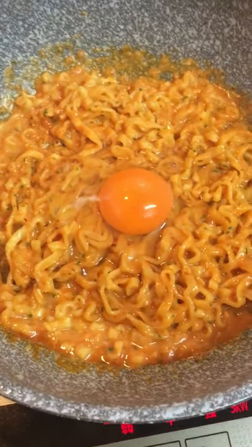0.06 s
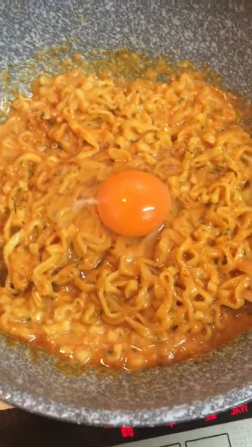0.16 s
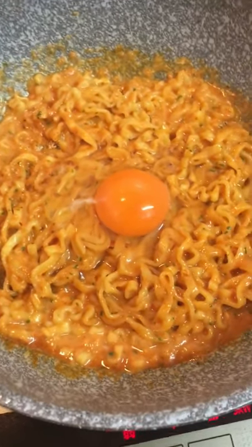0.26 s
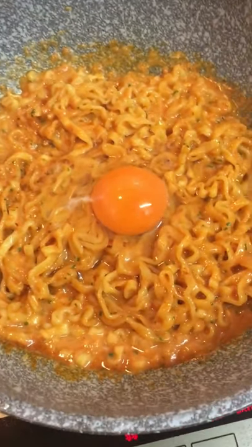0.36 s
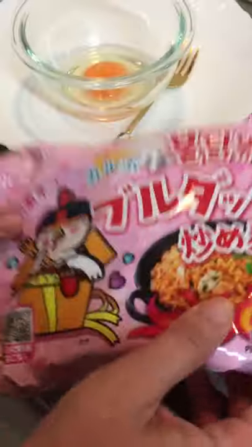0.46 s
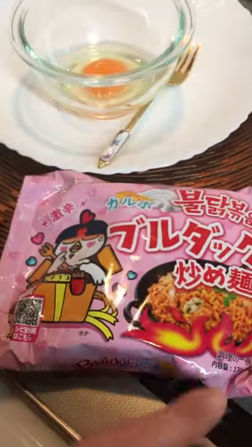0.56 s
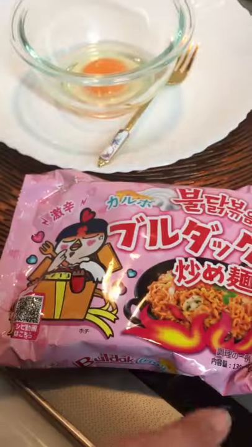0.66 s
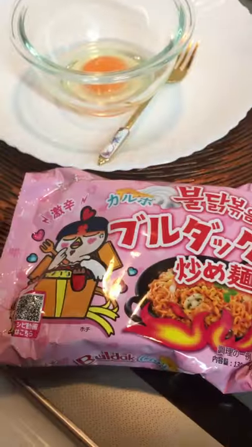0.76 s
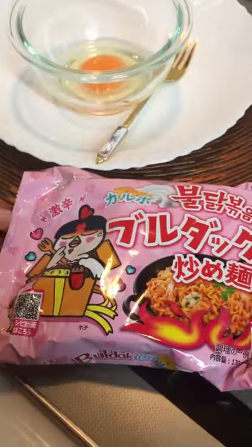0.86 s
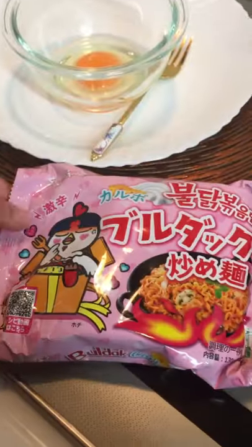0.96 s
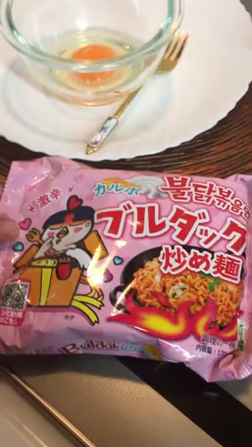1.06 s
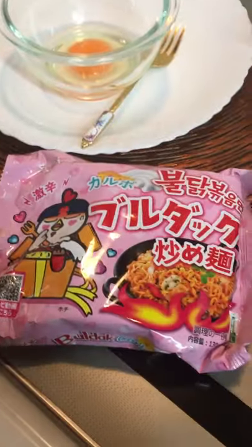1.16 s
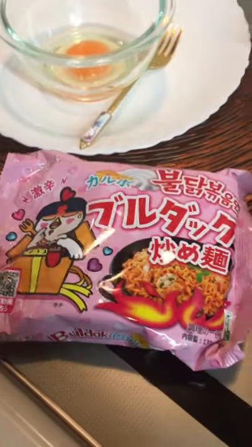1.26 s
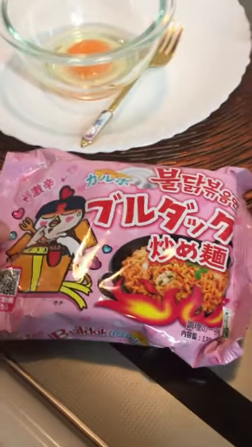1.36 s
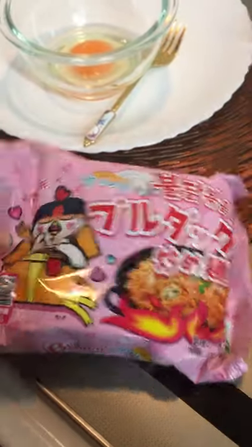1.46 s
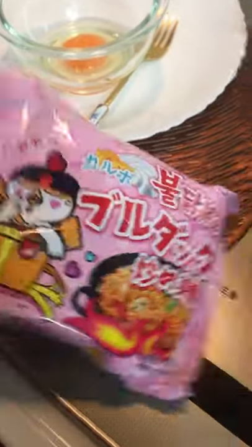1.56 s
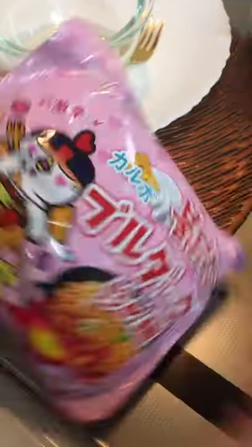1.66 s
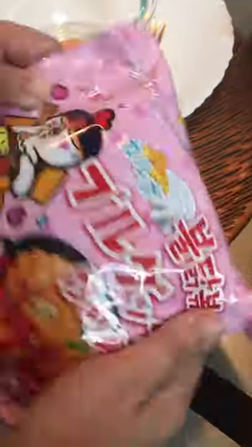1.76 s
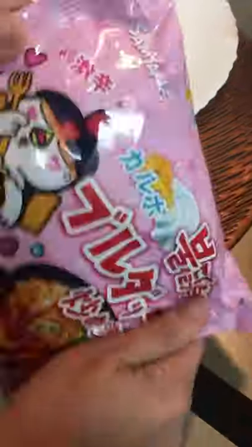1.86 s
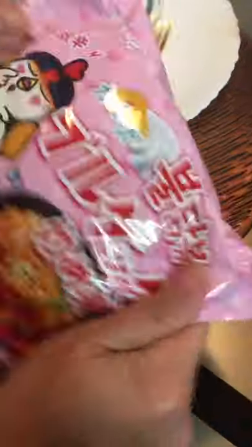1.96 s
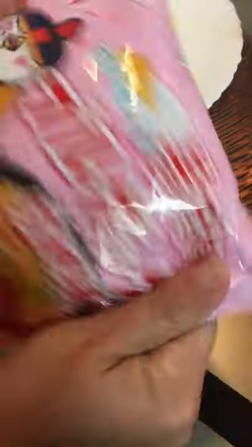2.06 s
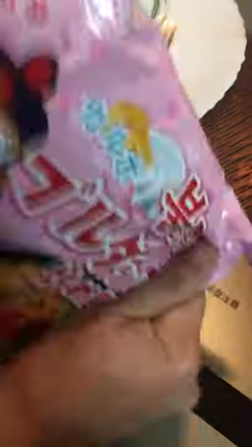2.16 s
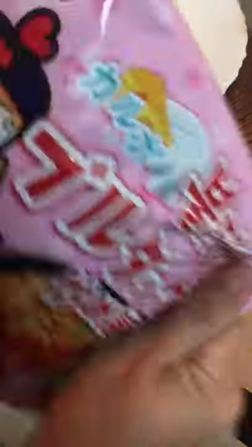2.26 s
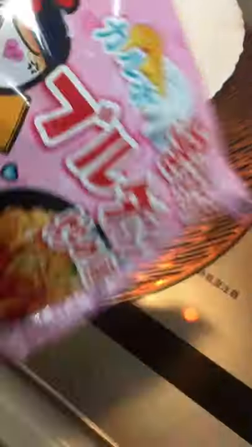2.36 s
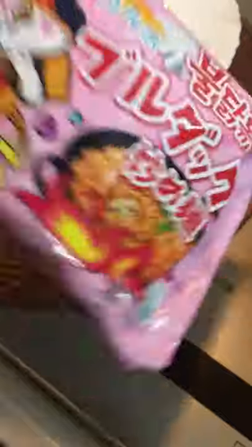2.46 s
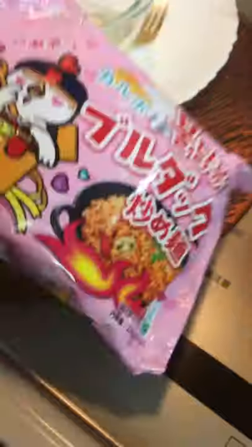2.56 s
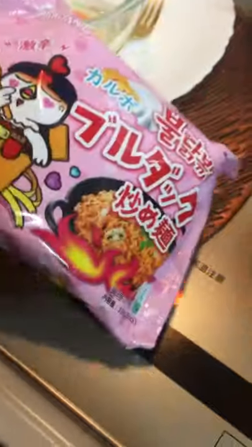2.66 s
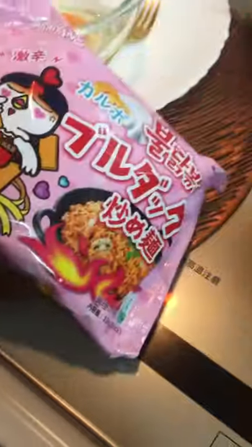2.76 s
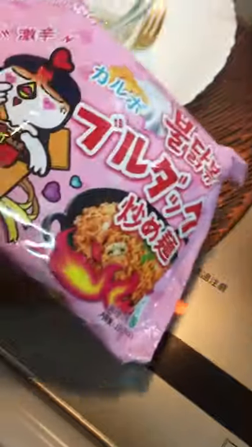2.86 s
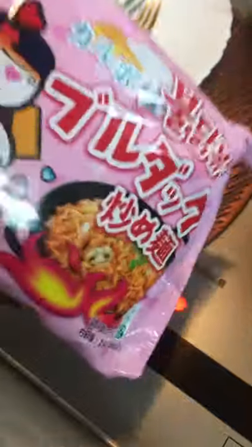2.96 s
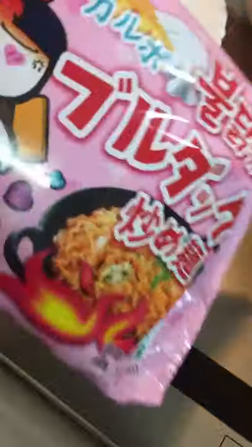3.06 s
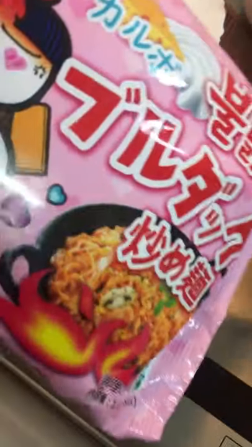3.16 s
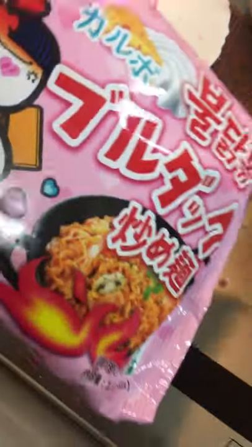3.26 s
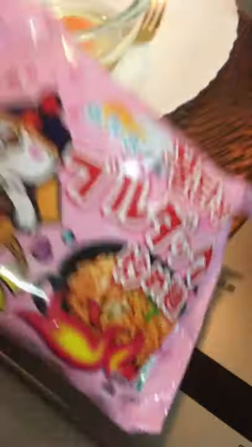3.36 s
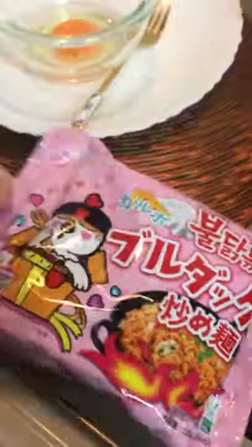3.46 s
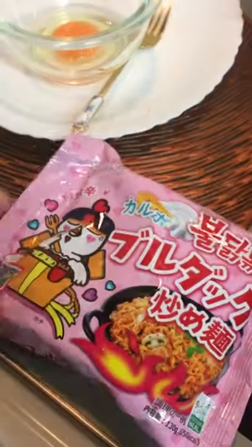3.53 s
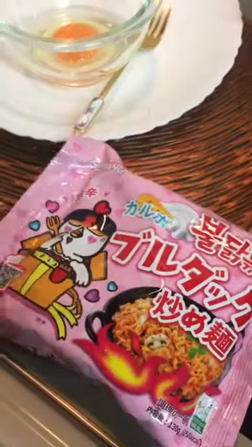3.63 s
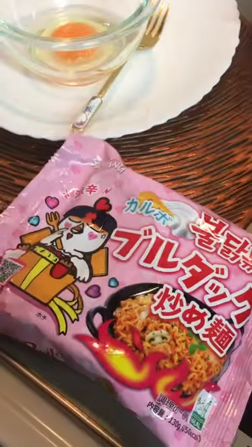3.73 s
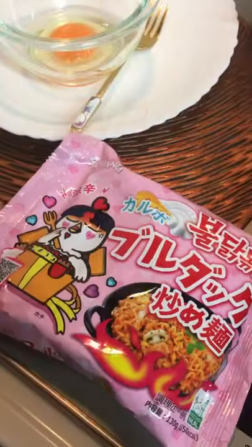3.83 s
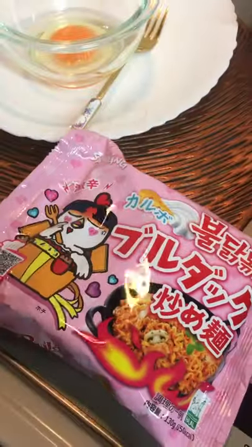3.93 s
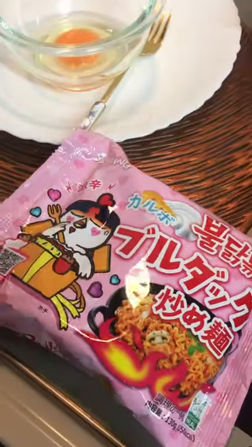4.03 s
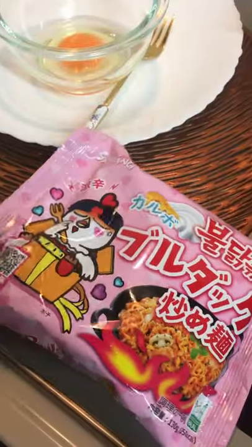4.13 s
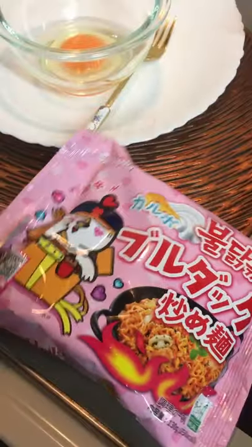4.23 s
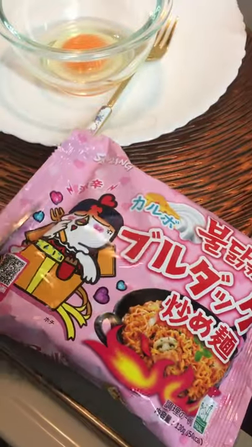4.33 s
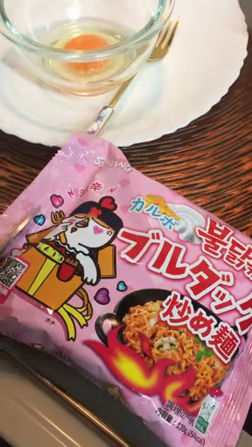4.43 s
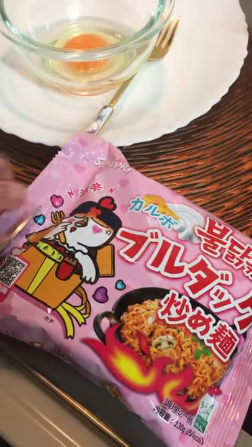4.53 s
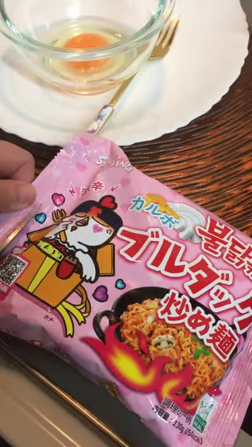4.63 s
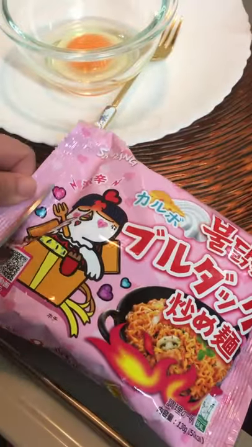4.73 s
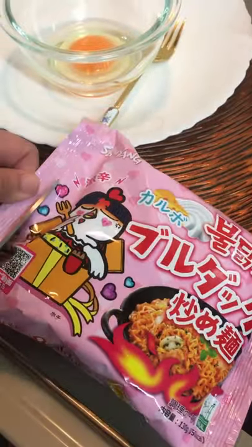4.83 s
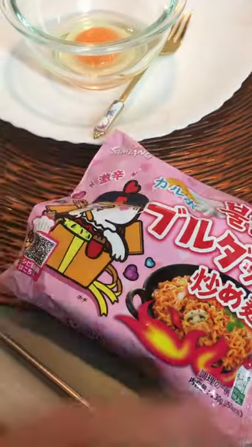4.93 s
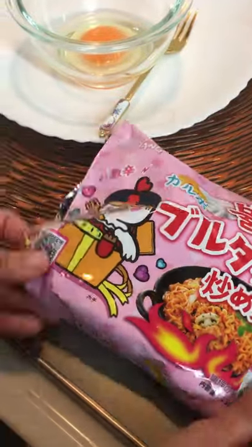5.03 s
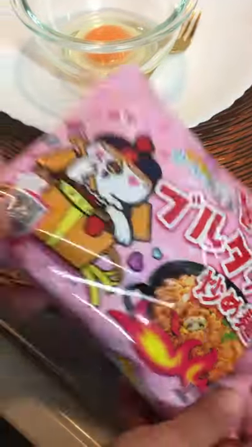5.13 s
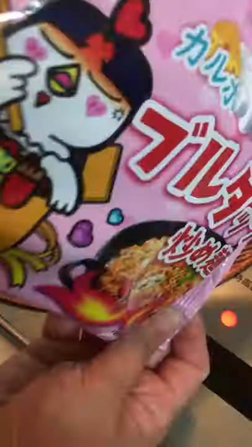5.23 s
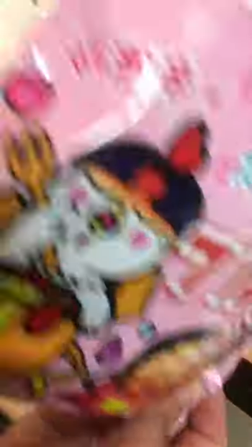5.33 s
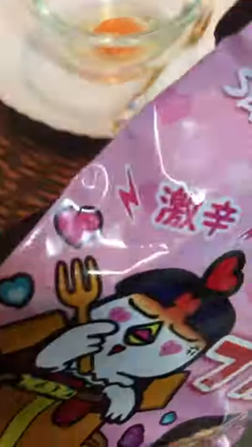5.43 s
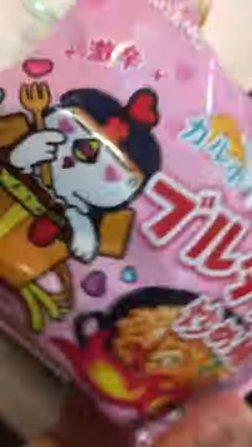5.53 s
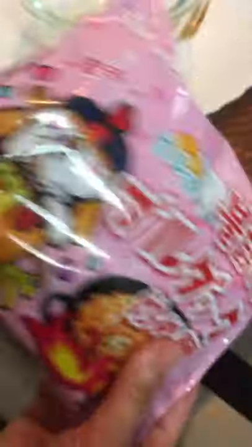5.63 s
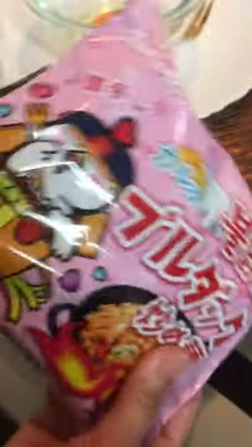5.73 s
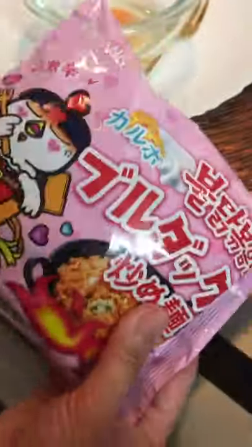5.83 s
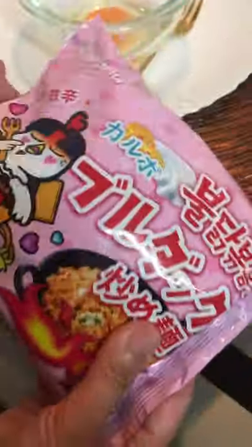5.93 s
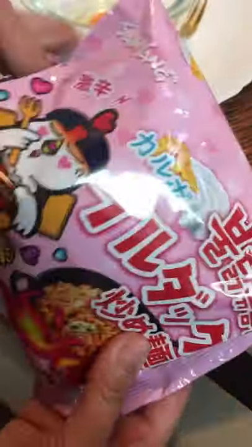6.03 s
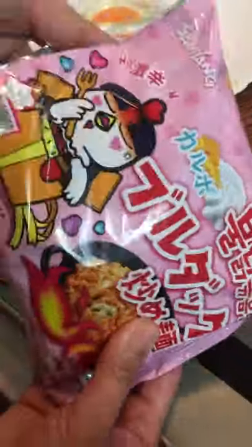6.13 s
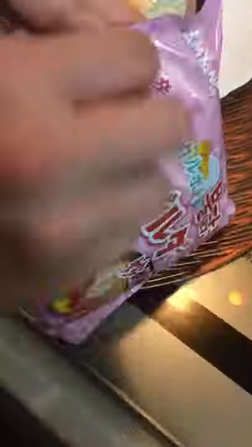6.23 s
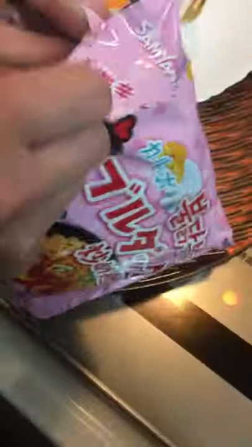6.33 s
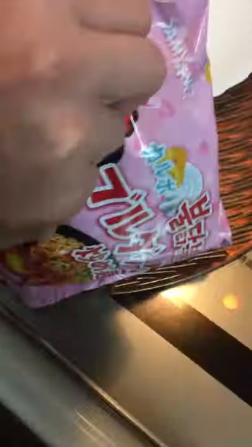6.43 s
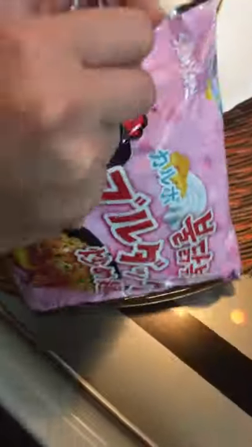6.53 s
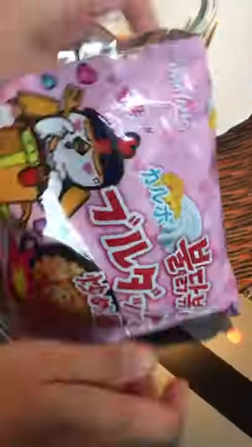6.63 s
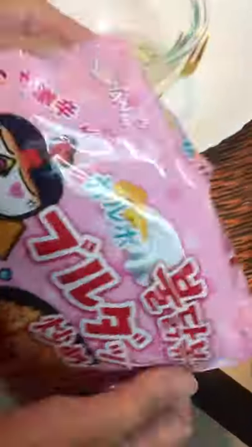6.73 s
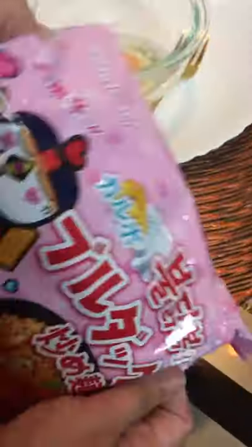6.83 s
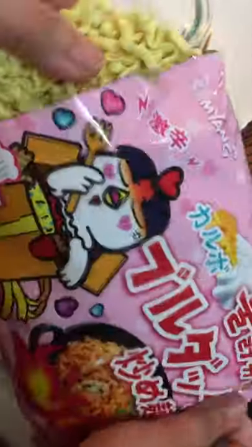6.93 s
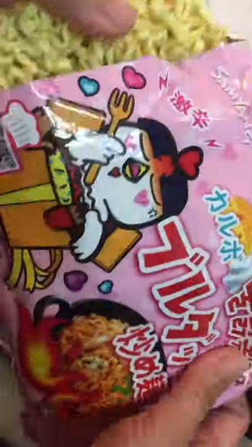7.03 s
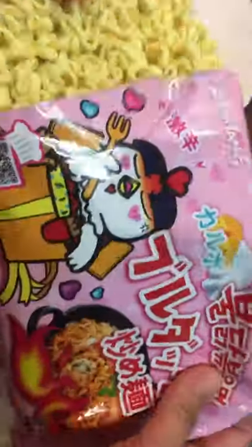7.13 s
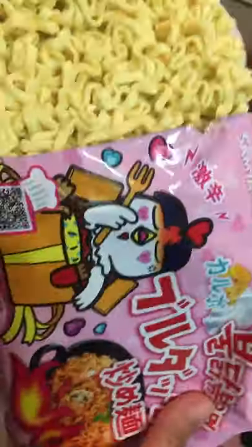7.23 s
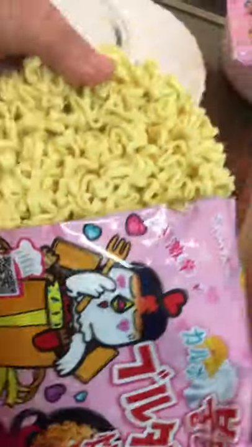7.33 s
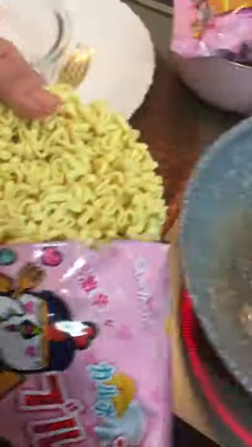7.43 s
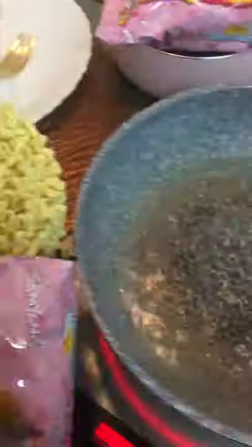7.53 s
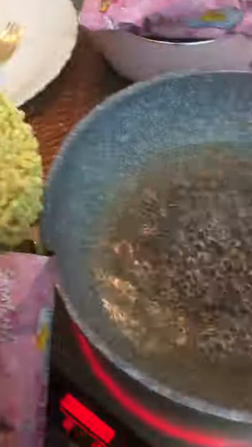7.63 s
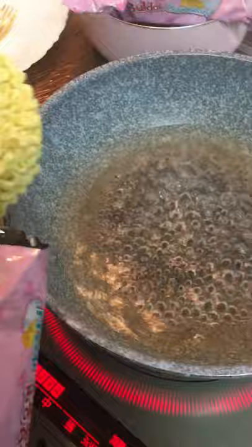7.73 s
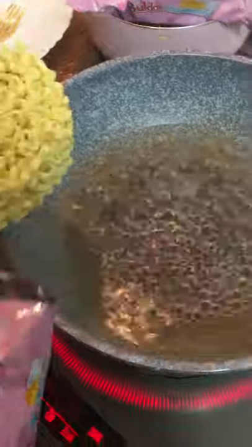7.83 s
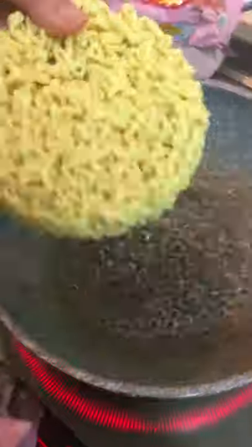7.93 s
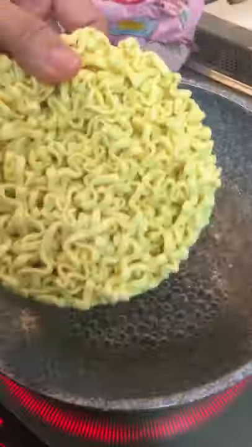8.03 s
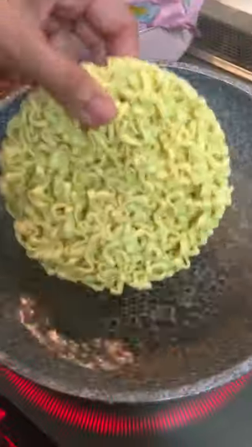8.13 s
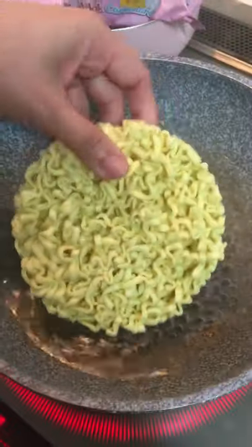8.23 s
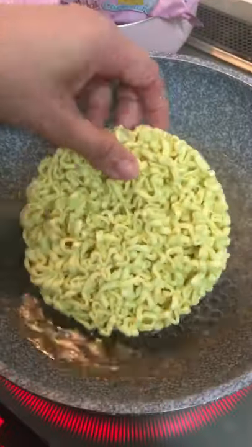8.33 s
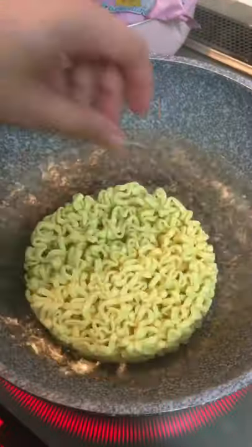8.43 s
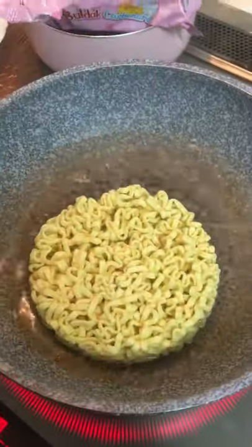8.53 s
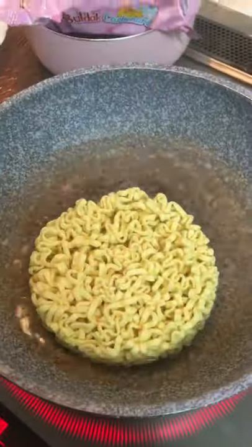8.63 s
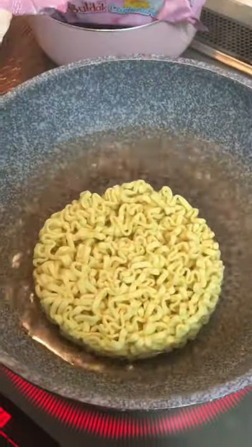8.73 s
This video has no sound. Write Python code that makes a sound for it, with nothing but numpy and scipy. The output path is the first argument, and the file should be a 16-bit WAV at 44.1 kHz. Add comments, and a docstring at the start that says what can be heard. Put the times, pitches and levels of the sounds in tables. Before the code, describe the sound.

Very close in a small kitchen with short reflections. From 0 to 0.35 s, faint sauce sizzle over low, rumbly humming air, a small pop at 0.2 and a tiny clink as it fades. At 0.52 a plastic packet slaps hard on the counter with a bright crack, then rests over a low steady hum. From 1.2 crinkling grows; between 1.7 and 2.4 it is dense and loud, full of sharp snaps, then thins. At 3.4 the packet drops with a firm knock; sparse crackles, squeezes and soft dull bumps follow until a cut at 4.8. The next shot sounds speeded up, with a higher fan hum: light quick crinkles from 5, then bright, brisk tearing crackle from 5.9 to 7.1. It dwindles to small ticks; a snap with a faint knock at 8.4 and brief crackle until 8.8 end it, fan noise fading after 9.

```python
"""Noodles sizzle in a pan, with one pop and a faint clink; then a plastic noodle packet is slapped down,
crinkled, lifted and torn open in a small kitchen, heard close. Three edited shots, faded at the cuts:
the pan, the packet by a humming counter, and a faster shot by the stove, whose fan hums higher.
Crackle is dense random pops of film panels; snaps are cracks of noise with a ringing panel; knocks ring
the packet and counter with a gritty push; air is filtered noise, and hums are wavering tones."""
import sys
import numpy as np
from scipy import signal
from scipy.fft import rfft, irfft
from scipy.io import wavfile

SR = 44100
rng = np.random.default_rng(int(sys.argv[2]) if len(sys.argv) > 2 else 0)


def to_wav(s):
    """Save 16-bit WAV."""
    ch = np.atleast_2d(s).T  # columns
    pcm = np.round(np.clip(ch, -1, 1) * 32767)  # PCM
    wavfile.write(sys.argv[1], SR, pcm.astype(np.int16))


N = 387638

# Fades of the pan, packet and stove shots: fade_in_s, full_s, fade_out_s, silent_s
SHOTS = [(-1, -.5, .27, .39), (.41, .525, 4.7, 4.84), (4.855, 5.03, 9, 10)]
# Colour of the steady air, one spectrum a shot: freq_hz, relative level_db
AIR_COLOURS = [
    [(15, -48), (25, -4), (114, 3), (212, -3.5), (263, -12), (1290, -18), (1520, -21.5), (7110, -32.5),
     (11900, -30), (16000, -33)],
    [(15, -62), (25, -30), (200, -4), (256, -10), (405, -11.5), (516, -16.5), (1560, -25.5), (1840, -17.5),
     (2150, -27), (2700, -23.5), (3620, -33), (4250, -27), (9840, -37), (13600, -33.5), (16000, -52.5)],
    [(35, -77), (60, -43), (156, -12), (354, -4.5), (417, -1.5), (553, -7.5), (862, -8.5), (1010, -17.5),
     (1310, -17), (1950, -22.5), (2840, -20), (3350, -23), (3850, -19.5), (4700, -24), (5400, -19.5),
     (6400, -26.5), (8120, -31), (13300, -26), (16000, -36)],
]
# Mean air level of each shot: level_db
AIR_LEVELS_DB = [-46, -51, -51]
# Appliance hums, one list a shot: pitch_hz, mean level_db (rms), waver_hz
HUMS = [
    [(100.4, -47.5, 17)],
    [(200, -53.5, 4.8), (90.6, -64.5, 20)],
    [(420, -54, 12), (179, -67, 34)],
]
# Single snaps of the film, led by one pop in the pan: start_s, peak_db of the bright part, panel pitch_hz
SNAPS = [(0.2219, -29, 1160), (0.5228, -8, 1490), (0.5264, -7, 2500), (0.659, -34, 8100),
         (1.1846, -28.5, 2160), (1.228, -23, 970), (1.272, -16.5, 13100), (1.321, -17.5, 1570),
         (1.3573, -17, 12000), (1.4823, -14, 6140), (1.6567, -14.5, 4750), (1.747, -13, 2980),
         (1.758, -11, 2900), (1.822, -9.5, 3010), (1.8461, -10.5, 2140), (1.909, -13, 2000),
         (2.012, -24, 2540), (2.061, -8.5, 2500), (2.099, -12, 2290), (2.117, -8.5, 1900),
         (2.184, -11, 5200), (2.199, -8.5, 2520), (2.305, -6.5, 4020), (2.3531, -14, 5470),
         (2.4596, -22.5, 1490), (2.5644, -23, 10500), (2.615, -27, 6960), (2.874, -25, 1400),
         (2.9969, -16, 13500), (3.237, -28.5, 4480), (3.312, -30, 11100), (3.3275, -17.5, 13300),
         (3.391, -13.5, 1490), (3.5046, -18.5, 2550), (3.594, -35, 1840), (3.707, -29.5, 2050),
         (3.741, -30, 2340), (3.8999, -23.5, 2550), (3.9363, -19.5, 4800), (3.9967, -25, 1990),
         (4.0272, -13.5, 3220), (4.1034, -13.5, 2060), (4.252, -19, 2140), (4.2949, -20.5, 6210),
         (4.357, -21.5, 2860), (4.4335, -24.5, 1920), (4.5034, -31, 2870), (4.582, -26, 2900),
         (4.7567, -22, 2340), (5.1886, -21.5, 13500), (5.3067, -15.5, 5760), (5.344, -24, 14300),
         (5.4789, -25.5, 8510), (5.5792, -18, 10900), (5.724, -20.5, 8580), (5.8515, -13, 11400),
         (5.9768, -8.5, 12700), (5.989, -15, 12000), (6.1715, -7.5, 11000), (6.345, -19, 11300),
         (6.437, -13, 11000), (6.4937, -14.5, 11700), (6.533, -14, 10400), (6.6457, -11.5, 9020),
         (6.7327, -9.5, 13100), (6.99, -12.5, 11500), (7.0045, -13, 12400), (7.0903, -14, 12100),
         (7.228, -31, 13200), (7.2396, -28, 9670), (7.344, -33, 3850), (8.375, -22, 8960),
         (8.6335, -18, 6450), (8.7012, -17, 9200)]
# Colour of small creases: freq_hz, level_db
CRISP = [(700, -19.5), (1300, -8), (2100, -5), (4500, -3.5), (8900, -4), (9800, -6), (12400, 1),
         (15500, -5.5)]
# Colour of large creases: freq_hz, level_db
DEEP = [(70, -38), (110, -0.5), (200, 1), (330, -2), (700, -4.5), (1300, -3.5), (2500, -47)]
# Packet meeting the counter, or noodle block knocking inside: start_s, peak_db, contact spread_s
KNOCKS = [(0.522, -7.5, 0.0022), (0.549, -26, 0.0046), (0.559, -25, 0.0055), (1.548, -26.5, 0.0051),
          (2.19, -23.5, 0.0052), (2.772, -29.5, 0.005), (3.389, -9.5, 0.0019), (3.511, -26, 0.0075),
          (6.346, -23, 0.0049), (6.529, -26, 0.018), (8.375, -38, 0.0073)]
# Ringing of packet and counter, before any speeding up: pitch_hz, level_db, t60_s
BODY_MODES = [(140, -16.5, 0.044), (212, -23, 0.042), (268, -19.5, .05), (427, -2, 0.056),
              (529, -1.5, 0.026), (630, -5.5, 0.039), (806, -11.5, 0.031), (1206, -2, 0.011),
              (1490, -11, 0.042), (2140, -5, 0.019), (2916, -9, 0.029)]
# Soft bumps through the counter: start_s, level_db, pitch_hz, t60_s
BUMPS = [(3.09, -36.5, 102, 0.35), (3.676, -28.5, 105, 0.16), (4.499, -39, 70.0, 0.15)]
# Decay of the kitchen reflections: freq_hz, t60_s
KITCHEN = [(200, 0.26), (1000, 0.11), (4000, 0.078), (12000, 0.071)]
# Large creases against small ones in the slow and the fast shot: level_db
DEEP_LEVELS_DB = [-12, -12]
# A faint clink as the first shot fades: start_s, level_db, pitch_hz, t60_s
CLINK = (0.368, -34, 2480, .04)
# Force of the hands in three long spells (lifting, turning over, tearing open): time_s, crackle level_db
GRIP = [
    [(1.216, -70), (1.228, -38), (1.27, -52), (1.345, -47.5), (1.37, -28.5), (1.45, -41.5), (1.48, -37),
     (1.54, -32.5), (1.59, -42.5), (1.65, -29.5), (1.675, -78)],
    [(1.705, -41), (1.72, -34), (1.755, -26), (1.79, -30.5), (1.85, -28.5), (1.88, -32.5), (1.915, -23.5),
     (1.945, -34.5), (1.965, -26.5), (2.005, -32.5), (2.025, -25.5), (2.06, -25.5), (2.08, -35),
     (2.11, -25.5), (2.2, -25), (2.228, -32.5), (2.24, -22.5), (2.285, -36.5), (2.31, -30), (2.37, -31),
     (2.42, -40), (2.54, -47), (2.6, -94)],
    [(5.9, -63), (5.92, -31.5), (5.95, -46), (5.985, -31.5), (6.045, -39.5), (6.065, -33.5), (6.13, -38),
     (6.145, -31.5), (6.2, -33.5), (6.23, -40), (6.26, -33), (6.33, -41.5), (6.347, -26.5), (6.36, -41.5),
     (6.41, -39.5), (6.48, -46.5), (6.495, -33.5), (6.522, -50.5), (6.536, -31.5), (6.62, -40), (6.69, -34),
     (6.735, -32), (6.77, -36), (6.8, -47), (6.82, -36), (6.88, -43), (6.93, -34), (6.95, -49.5),
     (7.0, -45), (7.05, -39.5)],
]
# Short separate squeezes of the film: start_s, length_s, crackle level_db
SQUEEZES = [(0.458, 0.068, -42), (0.525, 0.002, -21), (0.531, 0.031, -35), (2.762, 0.034, -44.5),
            (2.815, 0.12, -52.5), (3.389, 0.011, -27), (3.403, 0.03, -31.5), (3.45, 0.066, -40.5),
            (3.503, 0.046, -35.5), (3.817, 0.036, -50.5), (3.88, 0.75, -59.5), (3.99, 0.019, -34.5),
            (4.077, 0.015, -49), (4.138, 0.11, -42.5), (4.26, 0.07, -53), (4.349, 0.011, -36.5),
            (4.665, 0.074, -40), (5.002, 0.1, -37.5), (5.106, 0.053, -44), (5.178, 0.099, -54),
            (5.487, 0.063, -38), (5.551, 0.041, -37), (5.604, 0.059, -39), (5.703, 0.039, -45.5),
            (5.827, 0.032, -45), (5.872, 0.02, -36), (7.05, 0.077, -36.5), (7.145, 0.024, -35.5),
            (7.191, 0.033, -47.5), (7.27, 0.017, -45), (7.522, 0.12, -48.5), (8.494, 0.11, -40.5),
            (8.59, 0.24, -43.5)]
# Below this the packet radiates little, in the slow and the fast shot: cutoff_hz
FILM_LOW_HZ = [110, 159]

EDGE_HZ = 15900  # top of the audible band
SPEED = 2.1  # the last shot plays faster: raises crease rates, colours and knocks, shortens snaps
SIZZLE_DB = -56  # sauce spitting in the pan, rms
STRAY_DB, SETTLE_S = -66, 1.1  # faint ticks of touched film settling by itself, and when they start
REFLECTIONS_DB = -11.5
SNAP_DEEP_DB = -20  # deep part of a snap against its bright peak
DRIFT, DRIFT_HZ, SCATTER = .2, 24.9, .22  # slow and per-pop spread of panel size, share of the range
BUILD_S, BUILD_DB = 0.0064, -15  # the film creaks up to each snap
CRACK_S, FLUTTER_S, FLUTTER_DB = 0.00061, 0.0036, -15  # decay of the crack and of the settling after it


def gain_of(db):
    """Turns dB into amplitude."""
    return 10 ** (np.asarray(db) / 20)


def evened(x):
    """Scales to rms 1."""
    return x / np.sqrt(np.mean(x ** 2) + 1e-20)


def read(points, hz):
    """Reads a table on a log-frequency axis."""
    f, value = np.transpose(points)
    return np.interp(np.log(hz + 1), np.log(f + 1), value)


def add(mix, s, sound):
    """Mixes a sound in at s seconds."""
    part = mix[max(round(s * SR), 0):][:len(sound)]
    part += sound[:len(part)]


def sped(points, speed):
    """Moves a spectrum up by the playing speed."""
    return [(hz * speed, db) for hz, db in points]


def coloured(x, points):
    """Causal filter with the given spectrum (minimum phase by the cepstrum)."""
    level_db = read(points, np.fft.rfftfreq(4096, 1 / SR))
    cepstrum = irfft(np.log(gain_of(level_db)))
    # folding the cepstrum forward puts the energy of the response first
    cepstrum[1:2048] *= 2
    cepstrum[2049:] = 0
    taps = irfft(np.exp(rfft(cepstrum)))[:2048]
    taps = taps / np.linalg.norm(taps)
    return signal.oaconvolve(np.atleast_2d(x), taps[None], axes=1)[..., :x.shape[-1]]


def ring(x, hz, width_hz):
    """Two-pole resonance, dying sooner the wider it is."""
    r = np.exp(-np.pi * width_hz / SR)
    angle = 2 * np.pi * min(hz, 20000) / SR
    return signal.lfilter([1], [1, -2 * r * np.cos(angle), r * r], x)


def wander(rate_hz):
    """Slow random curve of rms 1, from low-passed noise."""
    return evened(signal.lfilter(*signal.butter(2, rate_hz, fs=SR), rng.standard_normal(N)))


def ambience():
    """Each shot has its own air, as filtered noise, and hums that waver in phase and level."""
    out, t = np.zeros(N), np.arange(N) / SR
    for shot, colour, air_db, hums in zip(SHOTS, AIR_COLOURS, AIR_LEVELS_DB, HUMS):
        spectrum = rfft(rng.standard_normal(N)) * gain_of(read(colour, np.fft.rfftfreq(N, 1 / SR)))
        sound = gain_of(air_db + wander(3)) * evened(irfft(spectrum, N))
        for hz, db, waver_hz in hums:
            phase = 2 * np.pi * (hz * t + rng.random()) + .25 * wander(waver_hz)
            sound += gain_of(db + 1.5 * wander(waver_hz)) * evened(np.cos(phase))
        out += sound * (t > shot[0]) * (t < shot[3])
    return out


def creases(per_s, spread_db, clump, low_hz, high_hz, count):
    """Dense random pops, each panel at its own pitch; panel size drifts as the fold moves."""
    strength = gain_of(spread_db * np.minimum(rng.exponential(1, N), 4))
    pops = strength * (rng.random(N) < per_s * clump / SR)
    place = .5 + DRIFT * wander(DRIFT_HZ) + SCATTER * rng.standard_normal(N)
    folded = abs((place + 1) % 2 - 1)  # turns back at the ends of the range
    panel = (count * folded).astype(int)
    t, out = np.arange(200) / SR, np.zeros(N)
    for k, hz in enumerate(np.geomspace(low_hz, high_hz, count)):
        pop = rng.standard_normal(200) * t * np.exp(-t / .00025)
        pop = evened(pop) + 1.65 * evened(ring(pop, hz, 0.4 * hz))
        out += signal.oaconvolve(pops * (panel == k), evened(pop))[:N]
    return out


def sizzle():
    """Bursting sauce bubbles make sparse bright pops during the first shot; one clink is a decaying sine."""
    pops = creases(150, 4, 1, 7000, 14000, count=8)
    pops = coloured(pops, sped(CRISP, 3))[0]
    in_pan_shot = np.arange(N) / SR < SHOTS[0][3]
    out = gain_of(SIZZLE_DB) * evened(pops) * in_pan_shot
    t = np.arange(900) / SR
    s, db, hz, t60 = CLINK
    add(out, s, gain_of(db - 60 * t / t60) * np.sin(2 * np.pi * hz * t))
    return out


def snaps():
    """The film creaks, cracks in under a millisecond, rings its panel and flutters as it settles."""
    out, lead_s = np.zeros(N), .01
    for (s, db, hz), noise in zip(SNAPS, rng.standard_normal((len(SNAPS), 1300))):
        speed = SPEED if s > SHOTS[2][0] else 1
        t = (np.arange(1300) / SR - lead_s) * speed  # the crack peaks at zero
        build = gain_of(BUILD_DB) * np.clip(1 + t / BUILD_S, 0, 1) ** 2
        settle = gain_of(FLUTTER_DB) * np.exp(-abs(t) / FLUTTER_S)
        flutter = np.where(t < 0, build, settle)
        grain = np.minimum(noise[::-1] ** 2, 4)  # roughens creak and flutter
        raw = noise * (np.exp(-abs(t) / CRACK_S) + flutter * grain)
        crisp = coloured(raw, sped(CRISP, speed))[0]
        deep = coloured(raw, sped(DEEP, speed))[0]
        panel = ring(np.diff(raw, prepend=0), hz, 0.35 * hz)
        bright = evened(crisp) + 0.96 * evened(panel)
        snap = bright / abs(bright).max() + gain_of(SNAP_DEEP_DB) * deep / abs(deep).max()
        add(out, s + 0.001005 - lead_s, gain_of(db) * snap)
    return out


def hand_force(t):
    """Squeezing force over time: long spells of handling plus short smooth squeezes."""
    force = 1e-5 + sum(gain_of(np.interp(t, *np.transpose(spell), -120, -120)) for spell in GRIP)
    for s, length_s, db in SQUEEZES:
        # soft edges reach a little past both ends
        squeeze = signal.windows.tukey(round((length_s + 0.0099) * SR), .6)
        add(force, s - .004, gain_of(db) * squeeze)
    return force


def crackle():
    """Small and large creases share the same bursts; harder squeezes buckle more panels a second."""
    out, t = np.zeros(N), np.arange(N) / SR
    force = hand_force(t)
    busy = np.clip((force / gain_of(-38.5)) ** 0.65, .8, 4.5)
    fast = t > SHOTS[2][0]
    for speed, deep_db, playing in zip((1, SPEED), DEEP_LEVELS_DB, (~fast, fast)):
        burst = gain_of(3.4 * wander(45 * speed))
        clump = busy * burst / burst.mean()
        crisp = creases(1150 * speed, 4.8, clump, 1900 * speed, 15000, count=24)
        crisp = coloured(crisp, sped(CRISP, speed))[0]
        deep = creases(900 * speed, 6.8, clump, 400 * speed, 1200 * speed, count=12)
        deep = coloured(deep, sped(DEEP, speed))[0]
        # dividing by sqrt(busy) offsets the loudness of the extra pops, so force sets the level
        both = evened(crisp / np.sqrt(busy)) + gain_of(deep_db) * evened(deep / np.sqrt(busy))
        out += playing * both
    stray = coloured(creases(40, 1.5, 0.97, 1500, 6100, count=10), CRISP)[0]
    stray = stray * (t > SETTLE_S) * ~fast
    return force * out + gain_of(STRAY_DB) * evened(stray)


def knocks():
    """A rough contact of some milliseconds rings the packet and counter."""
    out = np.zeros(N)
    for (s, db, spread_s), grit in zip(KNOCKS, rng.standard_normal((len(KNOCKS), 2000))):
        t = np.arange(8000) / SR * (SPEED if s > SHOTS[2][0] else 1)
        body = sum(gain_of(level_db - 60 * t / t60) * np.sin(2 * np.pi * hz * t)
                   for hz, level_db, t60 in BODY_MODES)
        contact = (0.091 + grit) * np.exp(-t[:2000] / max(spread_s, .001))  # push plus grit
        hit = signal.oaconvolve(contact, body)
        add(out, s + 0.001893, gain_of(db) * hit / abs(hit).max())
    return out


def kitchen(x):
    """Sparse reflections of random sign, each band dying at its own speed."""
    taps = np.zeros(SR // 2)
    at = np.arange(100, SR // 2 - 20, 20)
    taps[at + rng.integers(0, 20, len(at))] = rng.choice([-1., 1.], len(at))
    hz, t, bands = signal.stft(taps, SR, nperseg=128)
    decay = gain_of(-60 * t / read(KITCHEN, hz)[:, None])
    tail = signal.istft(bands * decay, SR, nperseg=128)[1]
    return signal.fftconvolve(x, tail / np.linalg.norm(tail))[:N]


def bumps():
    """Each soft bump is a sine and resonant noise near its pitch that swell and die."""
    out, t = np.zeros(N), np.arange(12000) / SR
    for (s, db, hz, t60), noise in zip(BUMPS, rng.standard_normal((len(BUMPS), 12000))):
        rumble = np.sin(2 * np.pi * hz * t) + 0.31 * evened(ring(noise, 0.94 * hz, 40))
        swell = np.minimum(t / 0.032, 1)
        add(out, s, gain_of(db - 60 * t / t60) * swell * rumble)
    return out


def film_radiation(near):
    """Thin film radiates no deep bass: a high-pass whose cutoff is higher in the fast shot."""
    slow, fast = (signal.sosfilt(signal.butter(4, hz, "high", fs=SR, output="sos"), near)
                  for hz in FILM_LOW_HZ)
    return np.where(np.arange(N) / SR > SHOTS[2][0], fast, slow)


def scene():
    """Pan and packet sounds with their reflections, over counter bumps and the air of each shot."""
    air = ambience()
    near = film_radiation(sizzle() + snaps() + crackle() + knocks())
    return (near + gain_of(REFLECTIONS_DB) * kitchen(near) + bumps() + air)[None]


def record(dry):
    """Fades the shots linearly at the cuts, then limits the band."""
    t = np.arange(N) / SR
    fade = sum(np.interp(t, shot, [0, 1, 1, 0]) for shot in SHOTS)
    low_pass = signal.firwin(511, EDGE_HZ, window=("kaiser", 9), fs=SR)
    return signal.oaconvolve(dry * fade, low_pass[None], "same")


dry = scene()
out = record(dry)
to_wav(out)
```